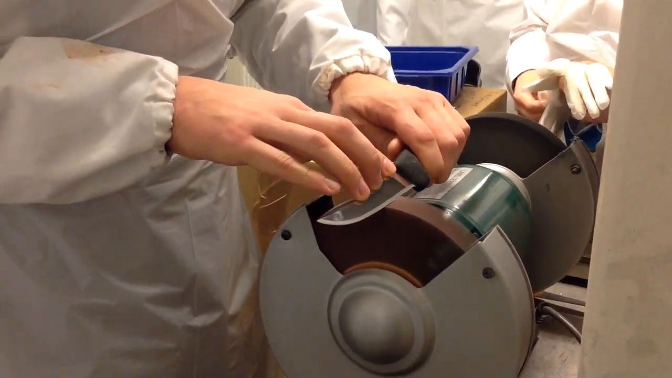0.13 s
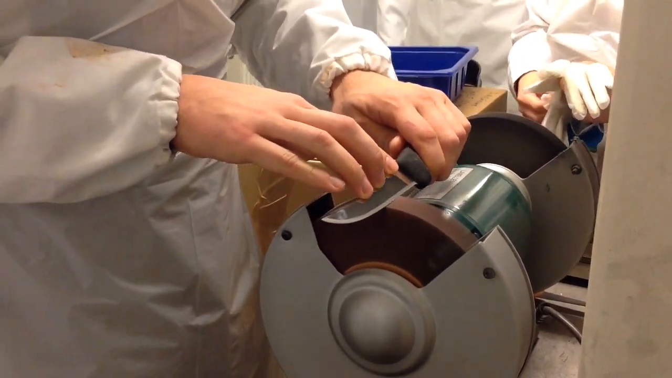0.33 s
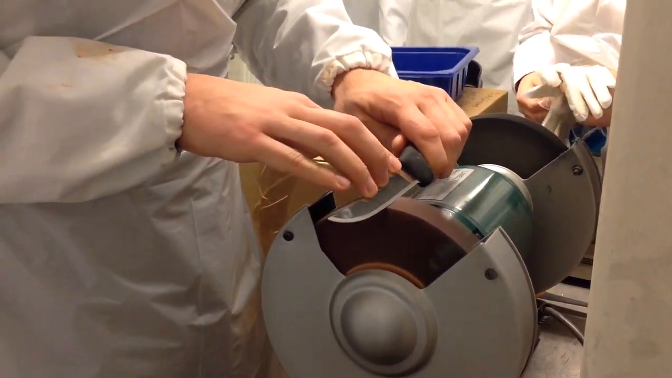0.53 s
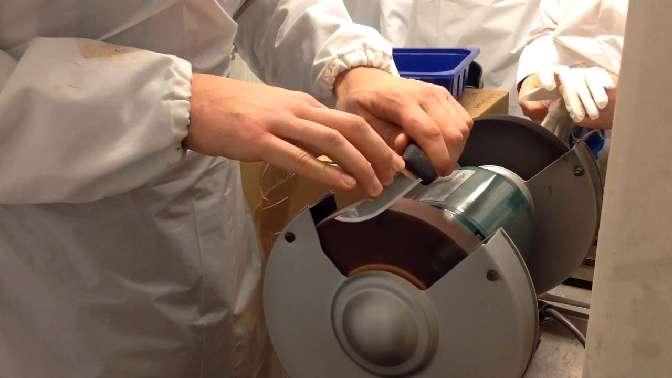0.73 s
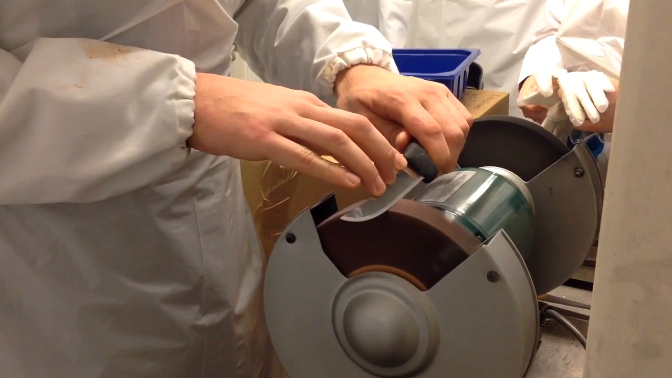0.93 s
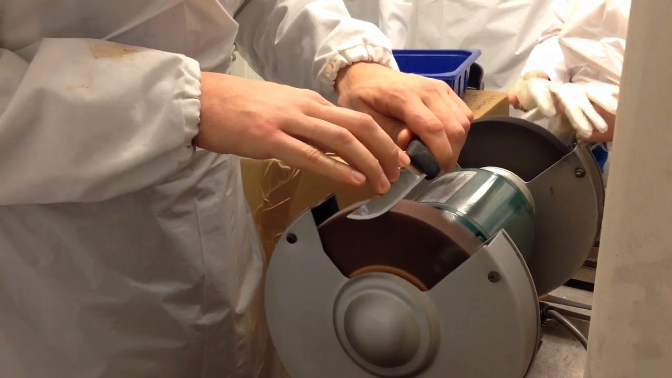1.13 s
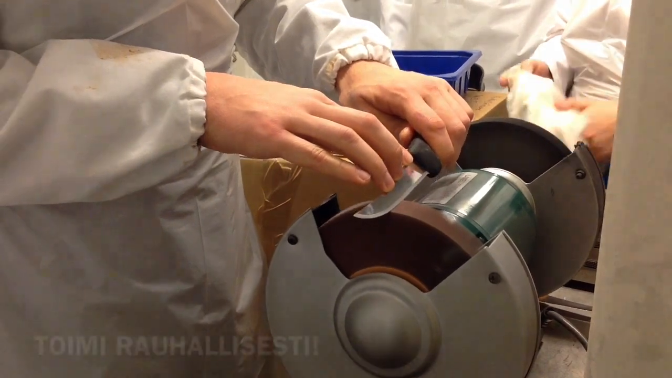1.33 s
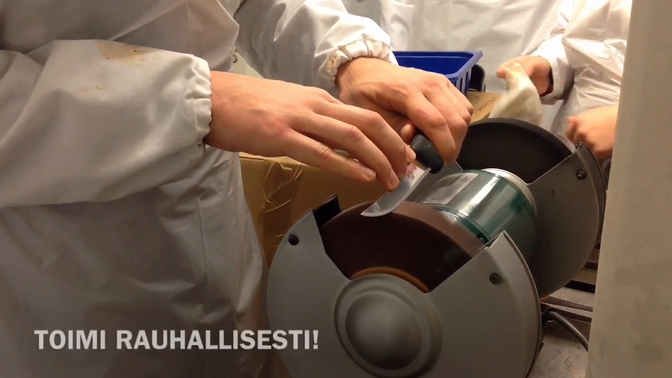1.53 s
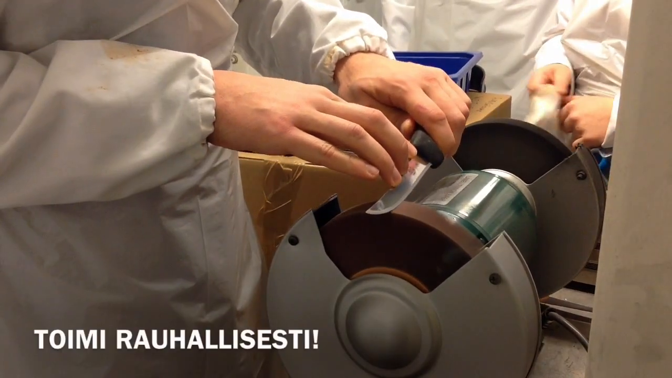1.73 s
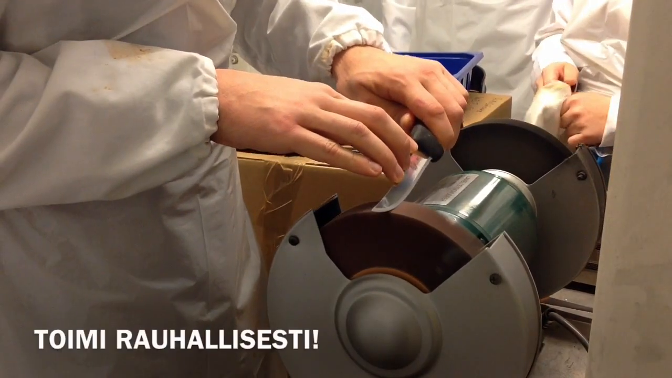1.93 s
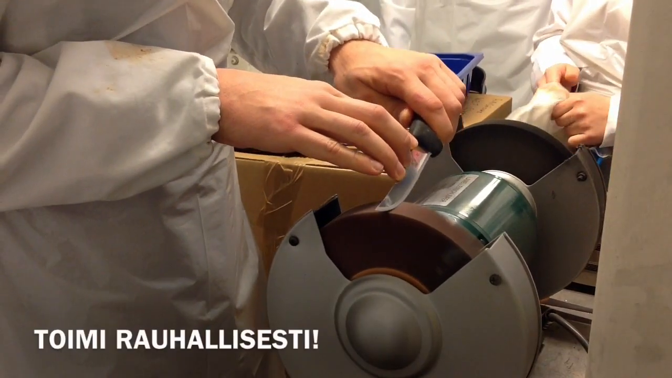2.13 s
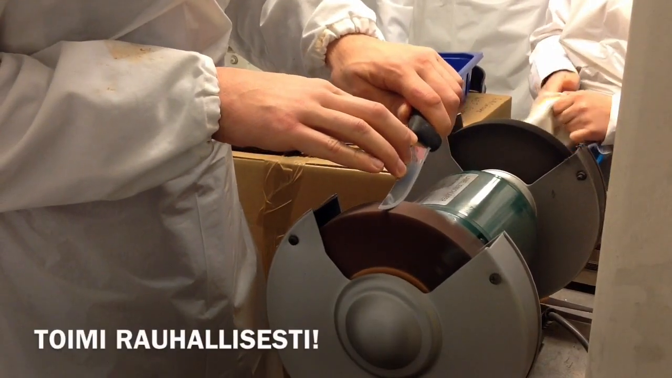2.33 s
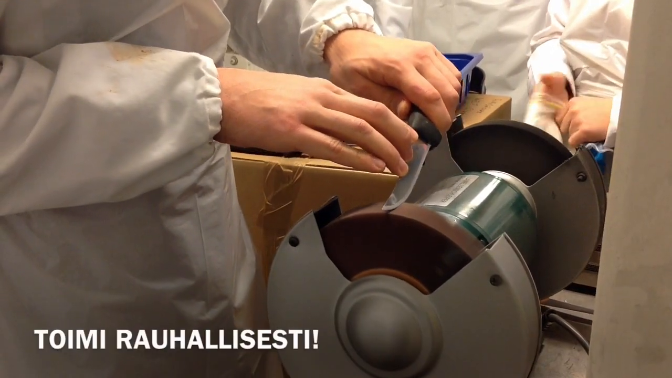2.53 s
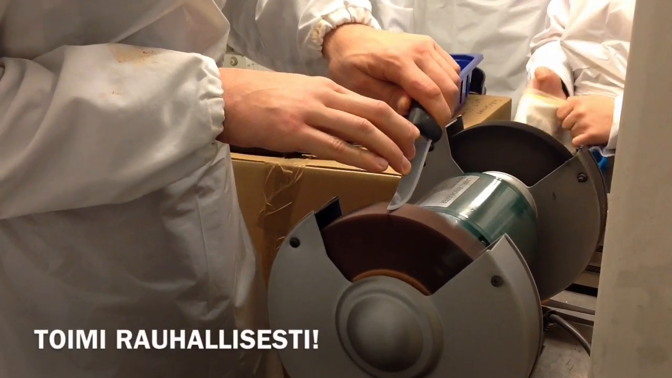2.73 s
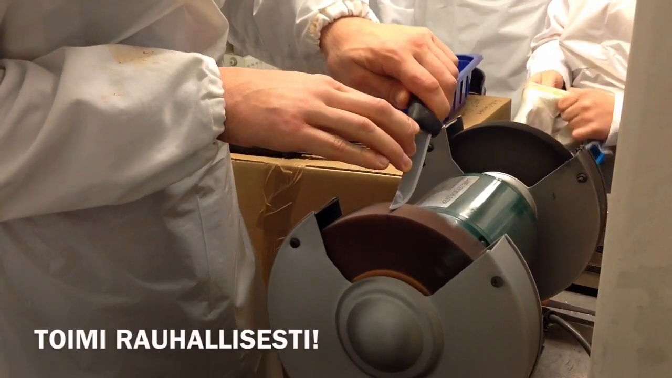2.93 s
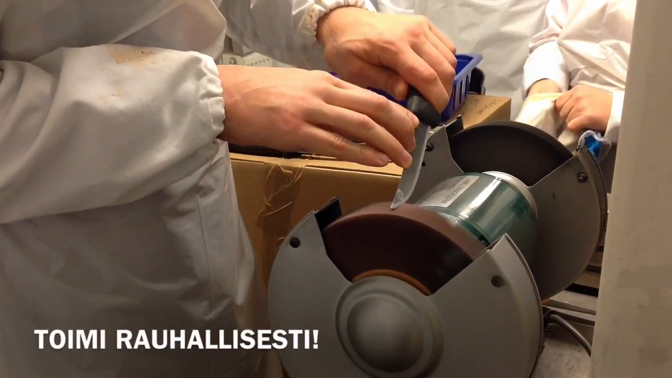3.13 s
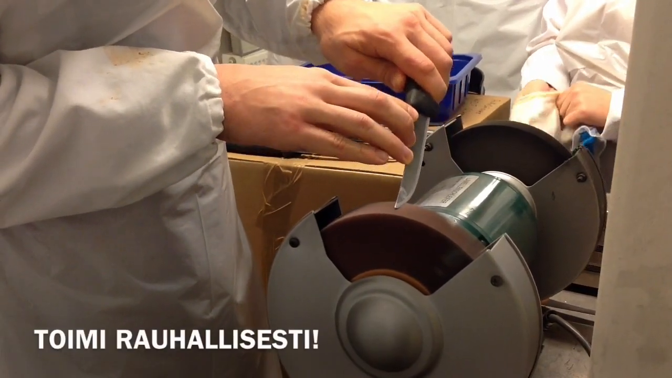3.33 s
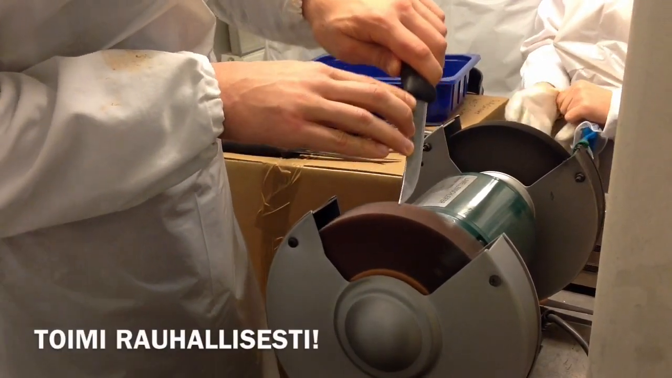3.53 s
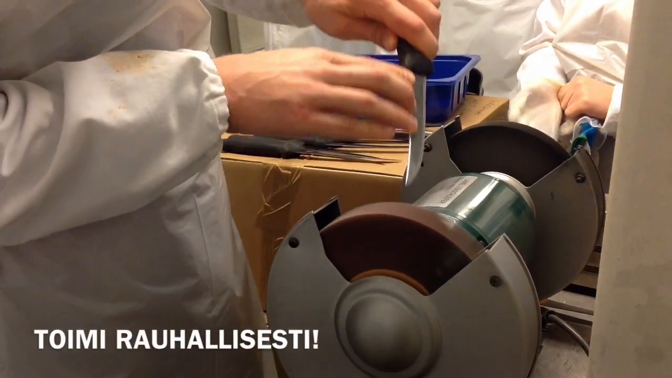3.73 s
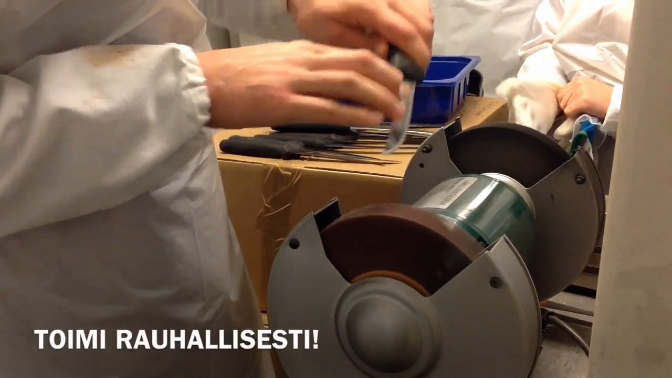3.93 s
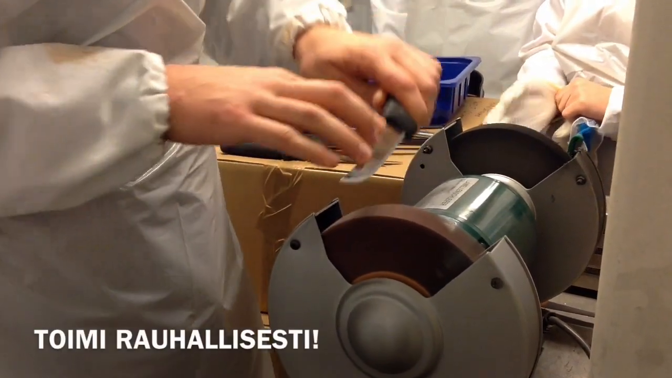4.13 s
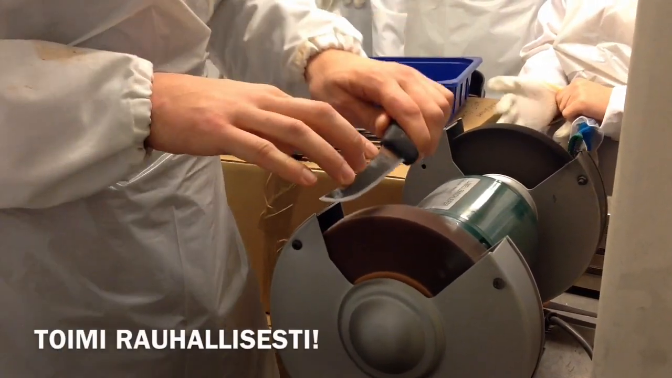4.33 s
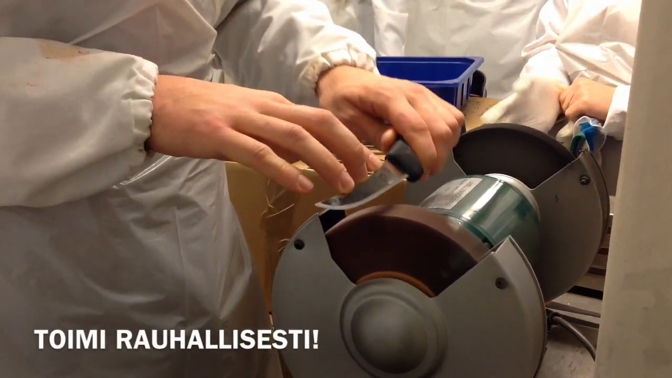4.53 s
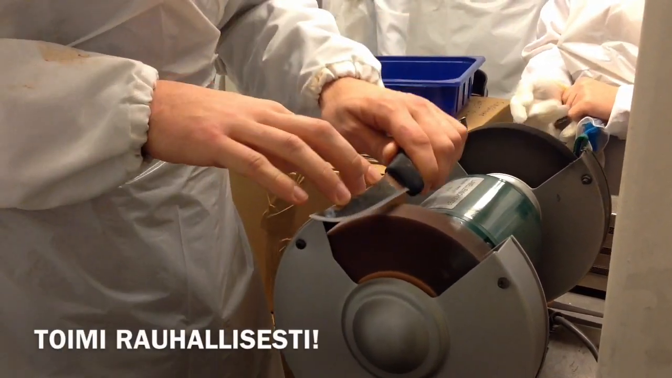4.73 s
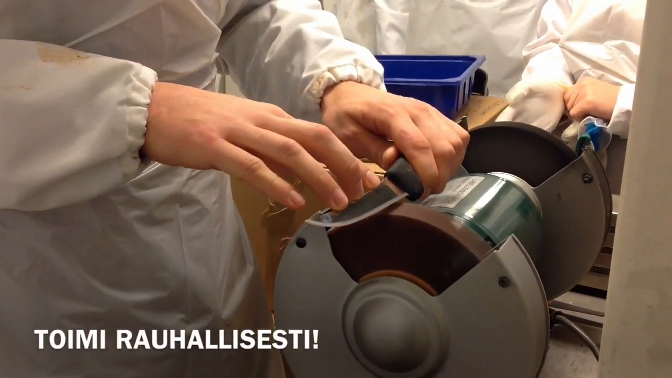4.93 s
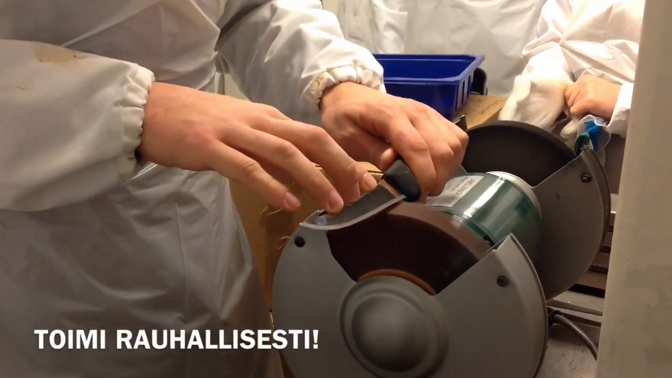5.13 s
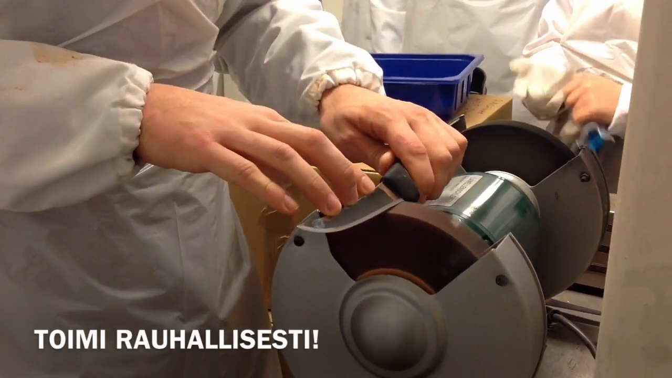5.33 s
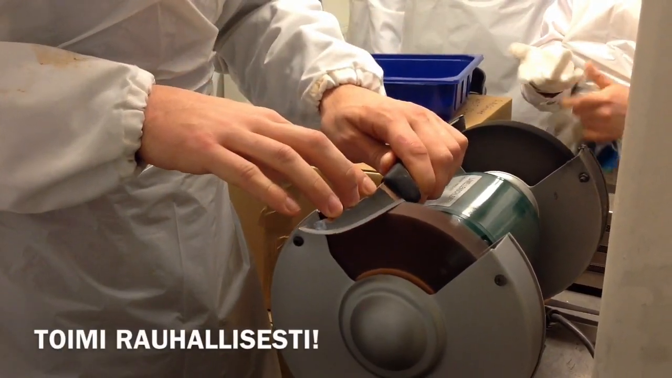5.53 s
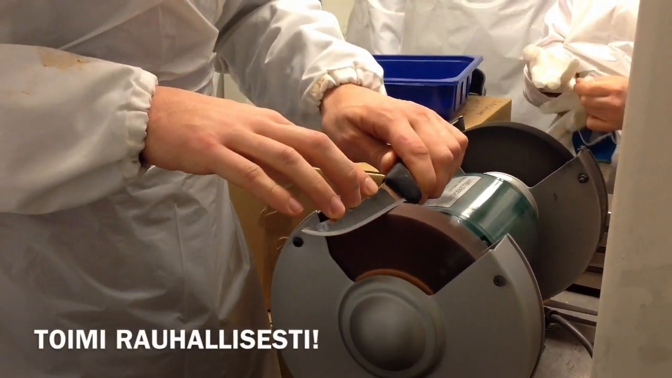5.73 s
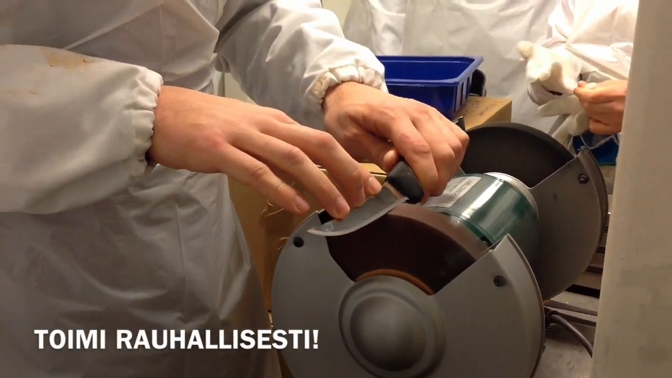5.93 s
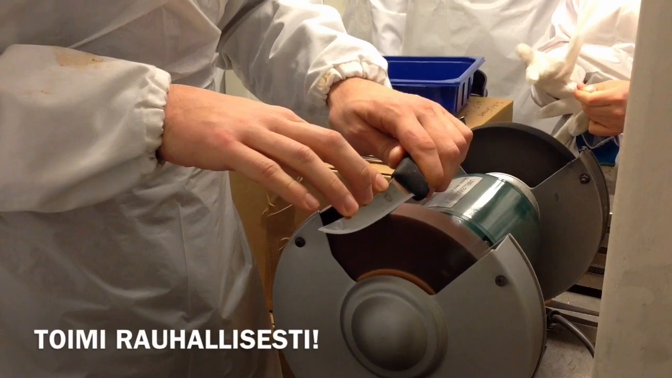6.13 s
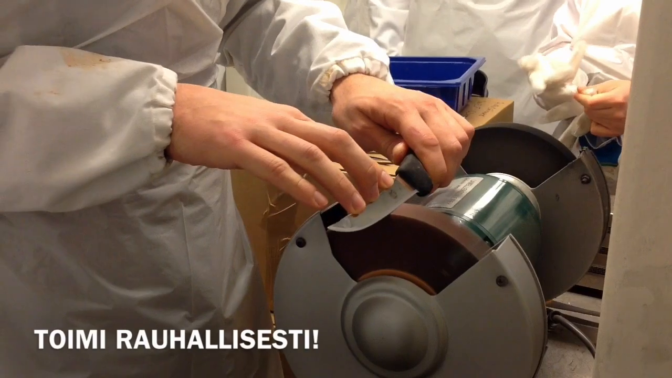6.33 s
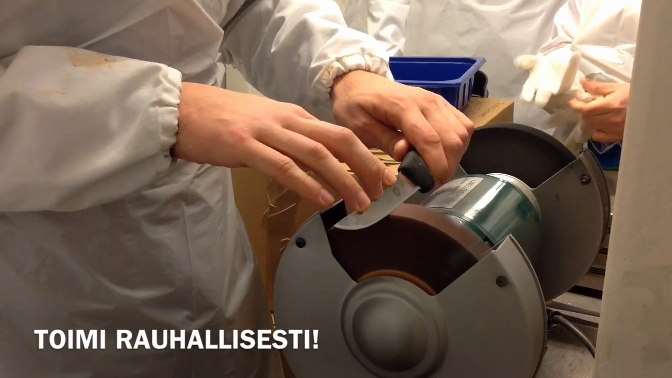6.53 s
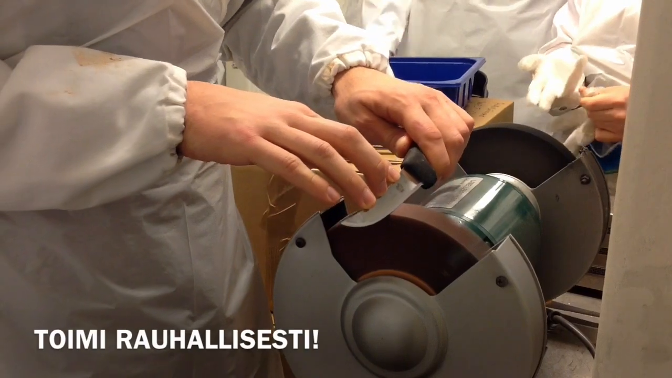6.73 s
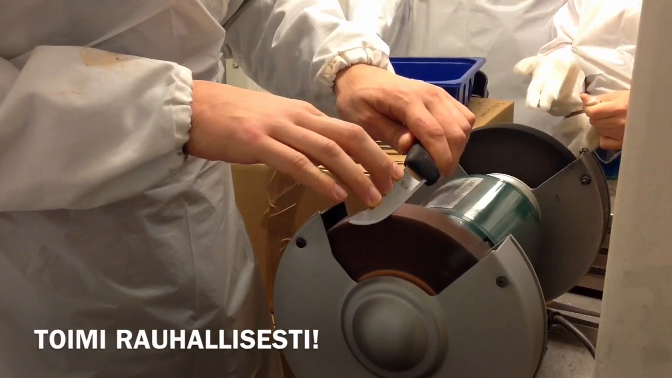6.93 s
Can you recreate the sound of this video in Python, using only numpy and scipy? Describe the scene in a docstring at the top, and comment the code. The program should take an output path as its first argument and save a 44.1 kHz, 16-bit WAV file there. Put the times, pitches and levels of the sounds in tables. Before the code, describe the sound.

From 0 s a knife blade is already pressed on a fast sharpening wheel: a dense, bright, sandy hiss with a rapid repeating grain, and through it a high, nearly steady whine near 3 kHz with shifting, fluttering overtones. Hand pressure makes levels waver gently. Beneath, quiet motor hum, rushing air and a hollow ringing guard begin to swell from about 2.5 s. Just before 3.65 s a very thin, high sizzle from the tip grows, then the blade lifts and hiss and whine cut off within a moment. Until 5.3 s the bare machine drones and rushes, slowly louder, with only a faint whistle and fine airy hiss. At about 5.36 s the blade touches again, the whine arriving just ahead of the quick hiss; the drone drops back after 5.5 s and grinding continues past 6.9 s. Single close microphone, small room with brief echo.

```python
"""A blade already hisses and whines on a spinning sharpening wheel, lifts off, and later touches down again.
The hiss is noise written round the rim, so it is nearly alike in every turn, plus fresh chips that are not.
The whine is four harmonics of the rate at which 64 segments pass the edge, with sidebands at the turning rate.
Stirred air, a resonant guard, shaft hum and a fine rim hiss run throughout; the first three swell slowly from late
in the first pass until just after the second touch. One microphone; the hiss echoes briefly in a small room."""
import sys
import numpy as np
from scipy import signal
from scipy.fft import rfft, irfft, next_fast_len
from scipy.io import wavfile
from scipy.ndimage import map_coordinates

SR = 44100
rng = np.random.default_rng(int(sys.argv[2]) if len(sys.argv) > 2 else 0)


def dump_mix(stems):
    """Bounce the given channels to the path in sys.argv[1] as a 16-bit WAV at rate SR."""
    frames = np.atleast_2d(stems).T  # one column per channel
    limited = np.clip(frames, -1, 1)  # hard clip at full scale
    pcm = np.round(limited * 32767).astype(np.int16)
    wavfile.write(sys.argv[1], SR, pcm)


N = 307377
TIME = np.arange(N) / SR  # s
SEGMENTS = 64
TOP_HZ = 15330  # upper band limit

# passes of the blade, the first begun before the start, the second outlasting the end: (touch [s], lift [s])
PASSES = [(-1.0964, 3.648), (5.363, 9.0)]
# each stroke draws the edge from heel to tip, which tilts the hiss and changes the flutter of the whine:
# (time since the touch [s], low band of the hiss [relative dB], top band of the hiss [relative dB],
#  flutter of the 1st harmonic [dB], flutter of the overtones [dB, before their weighting by order])
STROKE = [(0, -4, 3.5, -44, -37), (.35, -4.7, 5.5, -44, -32), (.85, -3.3, 4.5, -30, -27.5),
          (1.2, -3.5, 3, -30, -25), (1.7, -4.3, 1.5, -30.5, -29), (2.7, -4, 2.1, -40, -26),
          (4.1, -6, 1.3, -44, -31), (4.45, -5.5, 3, -34, -32), (4.72, -5, 7, -36, -34)]


def amp(db):
    """Amplitude ratio: 20 dB is a factor of ten."""
    return 10 ** (np.asarray(db) / 20)


def unit(x):
    """Normalization of a signal to an rms of 1."""
    return x / np.sqrt(np.mean(x ** 2) + 1e-20)


def along(points, hz):
    """Spectral envelope: (frequency [Hz], value) points joined on a logarithmic frequency axis."""
    f, v = np.transpose(points)
    return np.interp(np.log(hz + 1), np.log(f + 1), v)


def curves(rows, at=TIME):
    """Linear interpolation in time of each column after the first."""
    s, *cols = np.transpose(rows)
    return [np.interp(at, s, c) for c in cols]


def wobble(rate):
    """Slow random modulation: a smooth curve through `rate` random knots a second."""
    knots = rng.standard_normal(int(N * rate / SR) + 4)
    return map_coordinates(knots, [np.arange(N) * rate / SR])


def filtered(x, response):
    """Linear filtering: the spectrum of x times a response of frequency."""
    m = next_fast_len(N + SR // 4)
    return irfft(rfft(x, m) * response(np.fft.rfftfreq(m, 1 / SR)), m)[..., :N]


def echoes(x, t60, wet_db):
    """Reverberation: convolution with noise that decays by 60 dB in t60 seconds, added to the direct sound."""
    t = np.arange(SR // 3) / SR
    tail = rng.standard_normal(len(t)) * amp(-60 * t / t60) * (t > .002)
    return x + amp(wet_db) * signal.fftconvolve(x, tail / np.linalg.norm(tail))[:N]


def wheel_turns():
    """Rotation angle as the integral of speed: the wheel slows under load and recovers as the hand eases off."""
    free_turns_per_s, sag_turns_per_s = 49.66, .263
    slow_down_s, speed_up_s = .75, .4
    load = 0
    for touch, lift in PASSES:
        times = [touch, touch + slow_down_s, lift - speed_up_s / 2, lift + speed_up_s / 2]
        load = load + np.interp(TIME, times, [0, 1, 1, 0])
    return np.cumsum(free_turns_per_s - sag_turns_per_s * load) / SR


def contact_db(attack_s, release_s):
    """Exponential onset and decay: 0 dB in contact, 60 dB less one attack before and one release after."""
    gates = []
    for touch, lift in PASSES:
        away = np.maximum((touch - TIME) / attack_s, (TIME - lift) / release_s)
        gates.append(-60 * np.maximum(0, away))
    return np.max(gates, axis=0)


def stroke_time():
    """Clock of the stroke: seconds since the touch of the nearer pass."""
    (first_touch, first_lift), (second_touch, _) = PASSES
    return TIME - np.where(TIME < (first_lift + second_touch) / 2, first_touch, second_touch)


def shaft_tone(turns, multiple, drift):
    """Shaft-order tone: a sine of rms 1 locked to the rotation, its phase drifting by about `drift` radians."""
    phase = 2 * np.pi * (multiple * turns + rng.random())
    return np.sqrt(2) * np.sin(phase + drift * wobble(2.92))


def rim_trace(turns, memory, size=1024):
    """Nearly periodic noise: `size` random points round the rim, renewed gradually over `memory` turns."""
    tracks = rng.standard_normal((int(turns[-1]) + 4, size))
    blend = signal.windows.gaussian(81, memory)
    tracks = signal.fftconvolve(tracks, blend[:, None], "same", axes=0)
    return unit(map_coordinates(tracks.ravel(), [(turns + 1) * size]))


def rim_patches(turns, count=40):
    """Periodic modulation: coarse, smooth patches that come back with every turn."""
    return unit(map_coordinates(rng.standard_normal(count), [turns % 1 * count], mode="grid-wrap"))


def rim_air(level_db=-44):
    """Broadband flow noise: air hisses evenly along the spinning rim."""
    # spectrum of the rim hiss: (frequency [Hz], relative density [dB per Hz])
    rim_spectrum = [(1000, -30), (5000, 0), (8000, 0.5), (15000, -2)]
    noise = rng.standard_normal(N)
    return amp(level_db) * unit(filtered(noise, lambda hz: amp(along(rim_spectrum, hz)) * (hz < TOP_HZ)))


def drone_swell():
    """Slow crescendo: over three seconds, from before the lift to just after the next touch, then a quick drop."""
    peak_s, rise_s, fall_s = 5.52, 3, 0.17
    return np.interp(TIME - peak_s, [-rise_s, 0, fall_s], [0, 1, 0])


def stirred_air(swell, level_db=-38.5, swell_db=8):
    """Turbulence noise: the wheel stirs the air into a broad rush."""
    # spectrum of the stirred air: (frequency [Hz], relative density [dB per Hz])
    air_spectrum = [(25, -42), (70, -23), (110, -13), (160, -1), (300, -0.5), (480, -3), (800, -5),
                    (1500, -1), (2100, -3.5), (2700, -2.5), (4200, -11), (8000, -19.5), (15000, -26)]
    air = unit(filtered(rng.standard_normal(N), lambda hz: amp(along(air_spectrum, hz))))
    return amp(level_db + swell_db * swell) * air


def wheel_guard(turns, swell, level_db=-32.5, swell_db=8.5, locked_db=-4):
    """Forced resonance: buffeting air, partly repeating with each turn, rings the modes of the guard."""
    # resonances of the guard: (centre [Hz], width [Hz], relative level [dB])
    modes = [(337, 37, -9.5), (459, 35, -8.5), (614.5, 57.6, -3.5), (1050, 59.6, -0.5), (1162, 68, 0.5),
             (1406, 40, -9)]
    # the guard radiates mainly in the middle range: (frequency [Hz], relative level [dB])
    skirts = [(60, -48), (280, 1.5), (1400, -2.5), (3000, -20)]

    def response(hz):
        """Sum of second-order band-pass resonances of alternating sign."""
        ring = 0
        for k, (centre, width, db) in enumerate(modes):
            damping = 1j * hz * width
            ring = ring + (-1) ** k * amp(db) * damping / (centre * centre - hz * hz + damping)
        return ring * amp(along(skirts, hz))

    buffet = rng.standard_normal(N) + amp(locked_db) * rim_trace(turns, memory=3.15)
    return amp(level_db + swell_db * swell) * unit(filtered(buffet, response))


def shaft_hum(turns, swell, level_db=-1.8, swell_db=6):
    """Harmonic series of rotation: motor and shaft hum at whole multiples of the turning rate."""
    # orders of the hum: (multiple of the turning rate, level before the common gain [dB])
    orders = [(3, -53.5), (4, -50), (5, -56), (6, -52), (7, -55), (8, -56), (12, -52.5), (23, -42.5),
              (36, -49), (46, -54)]
    hum = 0
    for multiple, db in orders:
        hum = hum + amp(db + 2.25 * wobble(4.9)) * shaft_tone(turns, round(multiple), drift=0.42)
    return amp(level_db + swell_db * swell) * hum


def machine(turns):
    """Superposition of the running machine's sources under one common swell."""
    swell = drone_swell()
    return stirred_air(swell) + wheel_guard(turns, swell) + shaft_hum(turns, swell)


def whine(turns, drift=0.25, tremor_db=.6, wander=0.57, waver_db=0.44):
    """Siren principle: segments strike the edge in turn; a low spot eases contact once a turn, making sidebands."""
    # sidebands of the flutter: (offset from the harmonic [multiples of the turning rate],
    # relative level at the 1st harmonic [dB], relative level at the overtones [dB])
    sidebands = [(-3, -9, -9), (-2, -15, -6), (-1, 0, -3), (1, -13, -9), (2, -15, -15)]
    # level of each harmonic, one curve a pass, before gating and wavering: (time [s], level [dB])
    first_levels = [
        [(0.04, -21.5), (0.62, -18.5), (1.14, -20.0), (1.22, -18.5), (1.82, -16.5), (2.09, -22.0),
         (2.99, -15.5), (3.32, -18.5), (3.62, -27)],
        [(5.41, -27), (6.11, -24.5), (6.31, -26.5), (6.51, -22.0), (6.81, -25.5), (6.91, -23.0)],
    ]
    second_levels = [
        [(0.04, -26), (0.41, -19), (0.94, -28.5), (1.49, -16), (1.72, -22.5), (2.37, -18.5), (2.87, -29.5),
         (2.94, -24.5), (3.62, -29)],
        [(5.41, -26), (6.11, -16.5), (6.44, -23.0), (6.71, -20), (6.81, -23), (6.91, -18.5)],
    ]
    third_levels = [
        [(0.04, -38), (0.29, -22.5), (1.19, -32), (1.32, -24), (2.19, -25.0), (2.94, -32), (3.37, -18),
         (3.52, -20), (3.62, -35.5)],
        [(5.41, -38.5), (5.69, -25.5), (5.89, -25), (6.91, -20)],
    ]
    fourth_levels = [
        [(0.04, -25), (0.94, -32.5), (2.04, -29.0), (2.14, -36.0), (2.69, -19), (2.87, -23), (3.47, -21),
         (3.62, -27)],
        [(5.41, -22), (5.64, -13.5), (6.24, -27), (6.76, -30.5), (6.91, -39.0)],
    ]
    siren_db = -56  # the segments whistle faintly even with no blade on them
    approach_s, ring_off_s = 0.4, 0.18  # 60 dB times; the whine starts as the edge nears the wheel

    _, _, first_db, upper_db = curves(STROKE, stroke_time())
    low_spot = 2 * np.pi * (turns + rng.random())
    first_dip = amp(first_db) * sum(amp(db) * np.exp(1j * step * low_spot) for step, db, _ in sidebands)
    upper_dip = amp(upper_db) * sum(amp(db) * np.exp(1j * step * low_spot) for step, _, db in sidebands)
    out = amp(siren_db) * shaft_tone(turns, SEGMENTS, drift)
    # the higher the overtone, the later it starts and the more it wavers; above the second, its dip weakens
    for k, levels in enumerate([first_levels, second_levels, third_levels, fourth_levels], 1):
        phase = 2 * np.pi * (k * SEGMENTS * turns + rng.random()) + k * drift * wobble(3.8)
        level_db = curves(np.vstack(levels))[0] + k * waver_db * wobble(7)
        dip = first_dip if k == 1 else upper_dip * np.sqrt(2 / k)
        dip = dip * np.exp(1j * k * wander * wobble(2.02))
        gate = amp(contact_db(approach_s / k, ring_off_s))
        strength = gate * (amp(level_db + tremor_db * wobble(22)) - dip)
        out += np.sqrt(2) * np.real(strength * np.exp(1j * phase))
    return out


def tip_level_db(level_db=-21, rise_s=.7, fall_s=.1):
    """Exponential growth: the thin tip rings ever louder until it leaves the wheel; 60 dB rise and fall times."""
    away = [np.maximum((lift - TIME) / rise_s, (TIME - lift) / fall_s) for _, lift in PASSES]
    return level_db - 60 * np.min(away, axis=0)


def grit_scratch(turns, hand_sway=0.0042, fresh_db=-7.0):
    """Friction noise: a grit pattern repeating with the wheel, and fresh chips that do not repeat."""
    # spectrum of the grit on the blade: (frequency [Hz], relative density [dB per Hz])
    grit_spectrum = [(60, -71), (1300, -15), (2200, -13.5), (3400, -9), (4300, -5), (5000, -6),
                     (5600, -2.5), (7200, 0), (8800, -0.5), (10000, -1.5), (11300, 0.5), (13000, 4),
                     (13800, -3.5), (15000, 2)]
    contact = turns + hand_sway * wobble(3)  # the hand shifts the contact along the rim, in turns
    scratch = rim_trace(contact, memory=6.45) + amp(fresh_db) * rng.standard_normal(N)
    scratch = scratch * amp(1.35 * rim_patches(contact))
    return filtered(scratch, lambda hz: amp(along(grit_spectrum, hz)) * (hz < TOP_HZ))


def hiss(turns, tremor_db=0.55, tip_hz=14900, tip_width_hz=550, middle_db=-1.83, unsteady_db=.3):
    """Band-weighted friction noise: hand pressure sets its level, the blade's angle its colour."""
    # level following the pressure of the hand, one curve a pass, before gating and colour: (time [s], level [dB])
    pressure = [
        [(0.04, -20.0), (0.87, -19.5), (1.09, -21.5), (1.44, -20), (1.52, -21.0), (2.42, -19.0), (2.49, -20.5),
         (2.82, -19.5), (3.62, -21.5)],
        [(5.41, -24.0), (5.54, -21.5), (5.66, -22.5), (6.49, -21.5), (6.61, -20.0), (6.81, -23), (6.91, -19.5)],
    ]
    bite_s, lift_s = .11, .135  # the hiss rises and dies by 60 dB in these times
    level_db = curves(np.vstack(pressure))[0] + contact_db(bite_s, lift_s) + unsteady_db * wobble(7)
    low_db, top_db, _, _ = curves(STROKE, stroke_time())

    blade = grit_scratch(turns)
    low = filtered(blade, lambda hz: along([(5600, 0.99), (6800, 0.051)], hz))
    top = filtered(blade, lambda hz: along([(9500, 0.058), (11000, 0.95)], hz))
    middle = blade - low - top
    colour = amp(low_db) * unit(low) + amp(middle_db) * unit(middle) + amp(top_db) * unit(top)
    tip = unit(filtered(top, lambda hz: 1 / (1 + 2j * (hz - tip_hz) / tip_width_hz)))
    grinding = amp(level_db + tremor_db * wobble(30)) * colour + amp(tip_level_db()) * tip
    return echoes(grinding, t60=0.2, wet_db=-10.5)


def scene():
    """Superposition on one shaft angle; both channels carry the same signal."""
    turns = wheel_turns()
    mono = rim_air() + machine(turns) + whine(turns) + hiss(turns)
    return np.array([mono, mono])


def record(dry):
    """Band limitation: the recorder keeps nothing from TOP_HZ upward."""
    return filtered(dry, lambda hz: hz < TOP_HZ)


dry = scene()
out = record(dry)
dump_mix(out)
```